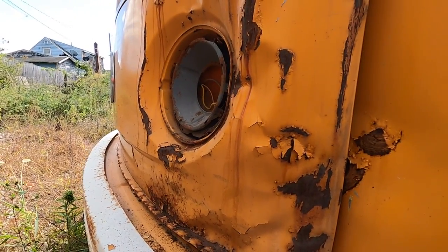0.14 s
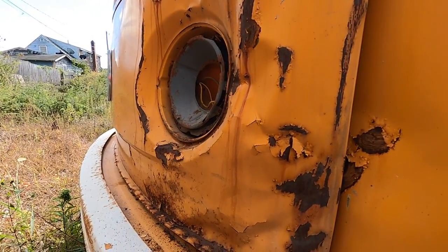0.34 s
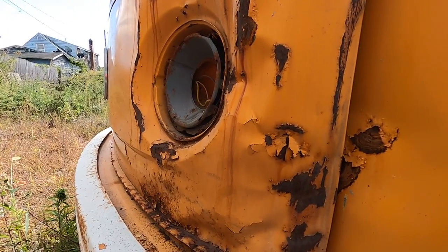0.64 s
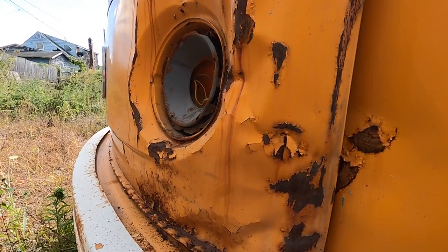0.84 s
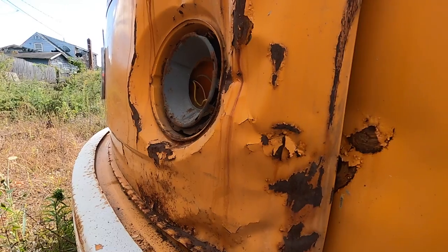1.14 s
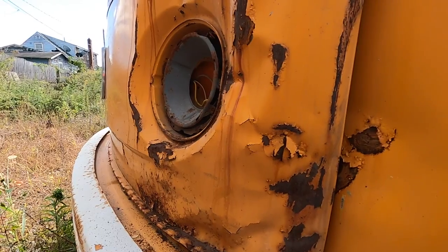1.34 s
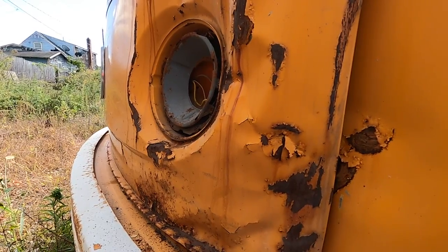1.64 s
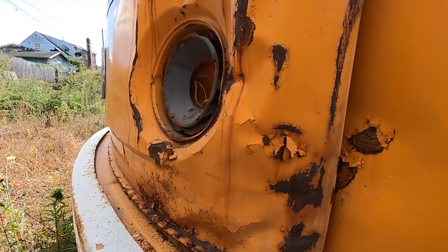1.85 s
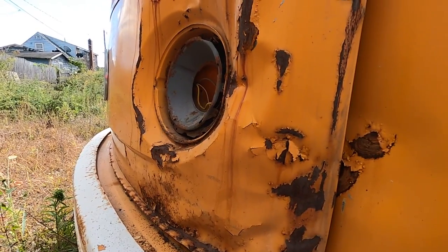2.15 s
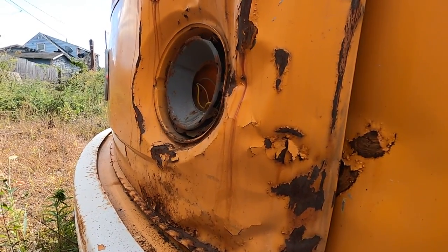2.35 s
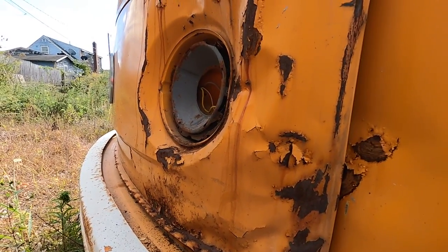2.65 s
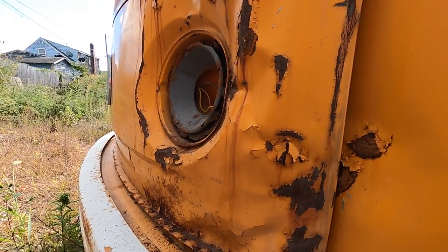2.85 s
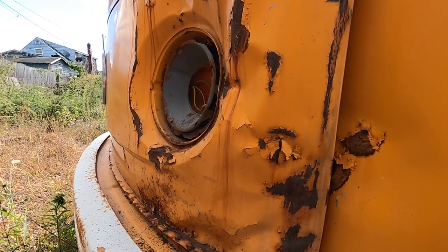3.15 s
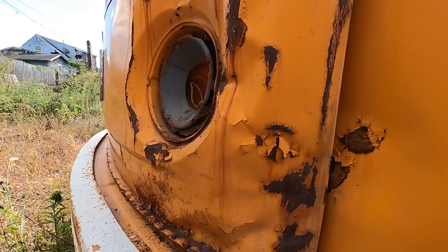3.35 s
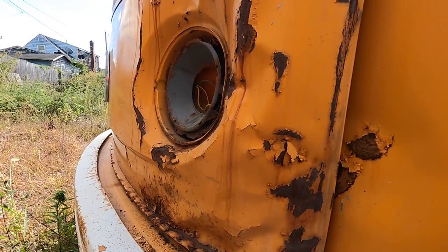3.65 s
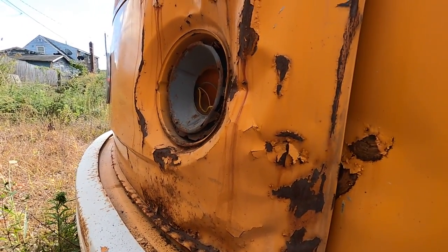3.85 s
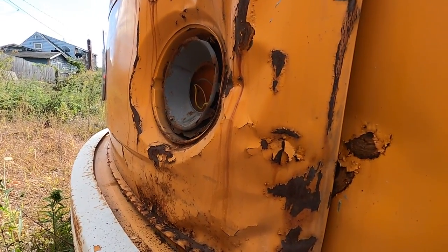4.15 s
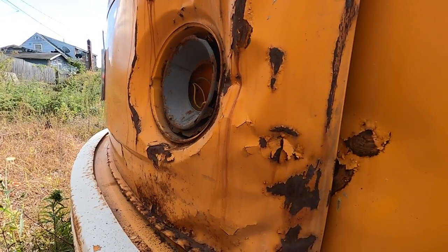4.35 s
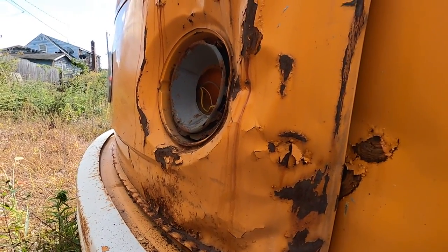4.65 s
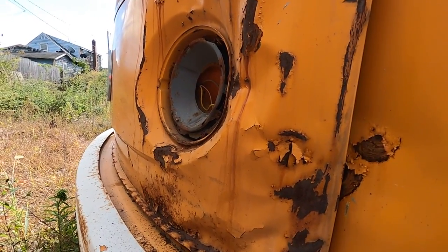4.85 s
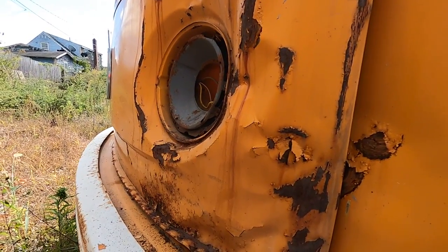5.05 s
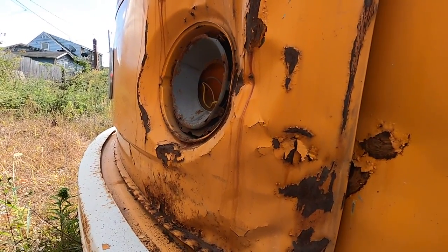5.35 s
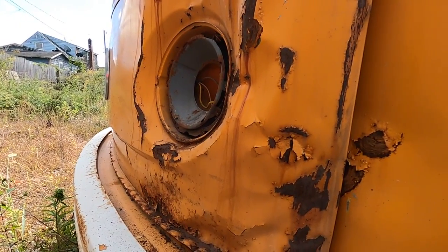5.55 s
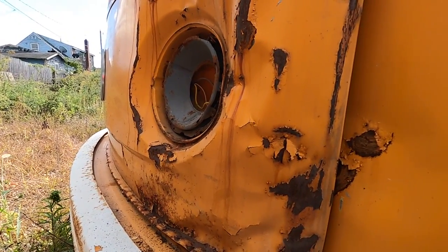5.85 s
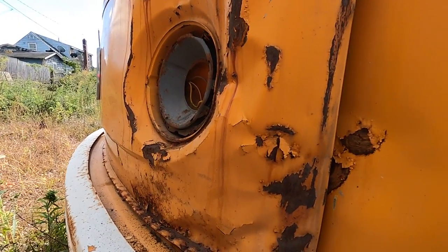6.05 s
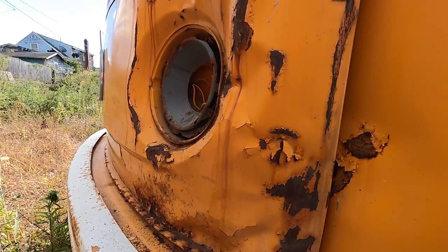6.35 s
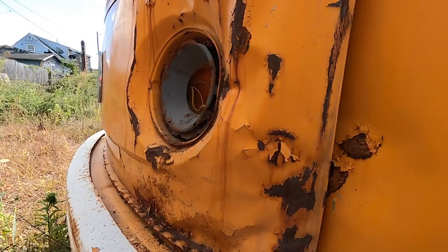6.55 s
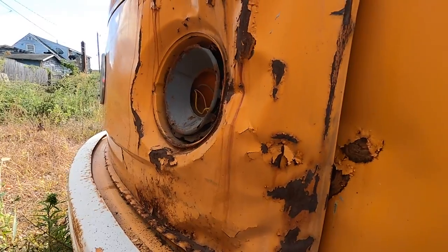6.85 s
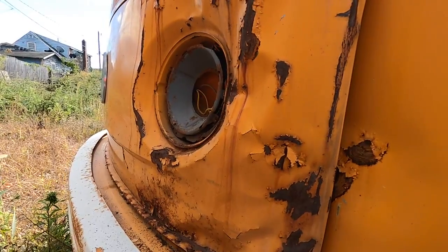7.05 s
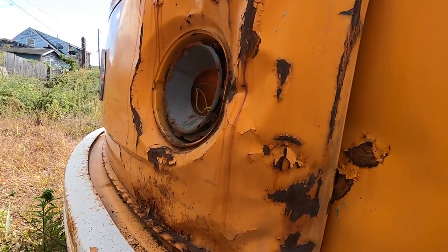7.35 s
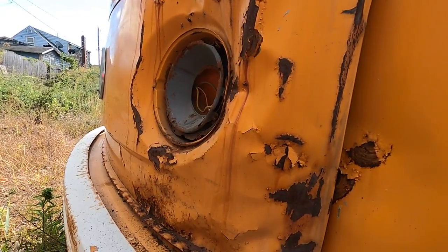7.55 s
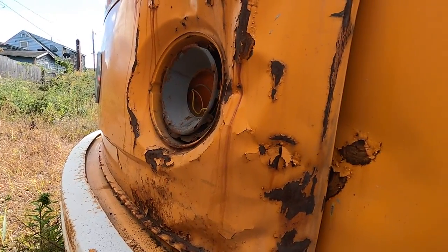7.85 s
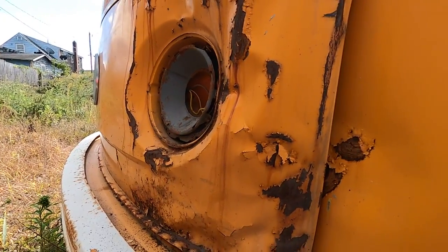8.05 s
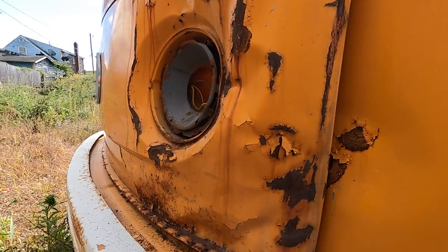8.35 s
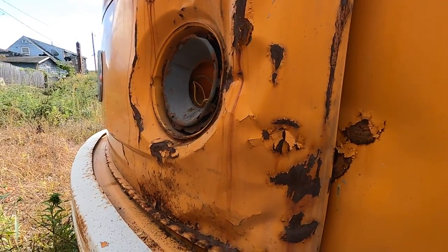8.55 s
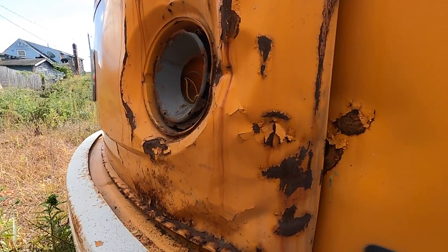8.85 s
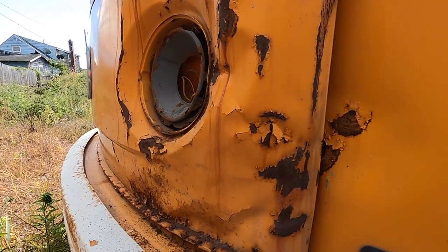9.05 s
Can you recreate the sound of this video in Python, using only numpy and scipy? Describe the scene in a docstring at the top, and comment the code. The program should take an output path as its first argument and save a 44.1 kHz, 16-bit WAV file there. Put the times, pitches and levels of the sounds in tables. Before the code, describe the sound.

Close up outdoors, a hydraulic hand pump pushes out a dented steel car panel. Loose handle pins rattle in sharp metallic clicks, lighter at one end of each stroke, then the stop lands with a short low thud that booms through the panel. Faint oil hiss, dull steel pops and tiny bright ticks fall between. High crickets trill steadily over distant traffic. Pumping ends before the last two seconds, leaving a late pop.

```python
"""In an overgrown yard a hand pump drives a hydraulic ram into a car's dented steel panel.
The handle's loose pins rattle as filtered noise bursts and set the tube and pump body ringing; its stop
thuds through the panel as short low tones, the steel pops, bright ticks snap and oil sings as narrow noise.
Crickets trill as pulsed resonances over the drone of far traffic, shaped noise with fuzzy engine tones.
All of it is heard by two close microphone ports."""
import sys
import numpy as np
from scipy import signal
from scipy.fft import rfft, irfft, next_fast_len
from scipy.io import wavfile
from scipy.ndimage import uniform_filter1d

SR = 44100
rng = np.random.default_rng(int(sys.argv[2]) if len(sys.argv) > 2 else 0)


def output_pcm(signal):
    """Save a mono or channel-first signal as 16-bit PCM at the path in sys.argv[1].

    Samples are clipped to [-1, 1] before scaling.
    """
    pcm = np.clip(np.atleast_2d(signal).T, -1, 1) * 32767
    wavfile.write(sys.argv[1], SR, np.round(pcm).astype(np.int16))


N = 406161  # length [samples]

# modes of the dented panel: (frequency [Hz], level [dB], decay by 60 dB [s])
PANEL_MODES = [(200.4, 9, 0.084), (285.3, -14, 0.43), (301.5, -7.5, 0.34), (353, 5, 0.064),
               (411, -10.5, 0.27), (476.6, 2.5, 0.069), (626, -16, 0.063), (722.5, -2.5, 0.087),
               (790, -23.5, 0.074)]
PORT_LAG = 2.0  # the left port hears the pump this much later [samples]
CLICK_PAN_DB = 1  # left minus right


def amp(db):
    """Decibels to a linear gain."""
    return 10 ** (np.asarray(db) / 20)


def evened(x):
    """Scales a sound to rms 1."""
    return x / np.sqrt(np.mean(x ** 2) + 1e-20)


def read(points, hz):
    """Reads a curve of (frequency, value) points along a log frequency axis."""
    point_hz, value = np.transpose(points)
    return np.interp(np.log(hz + 1), np.log(point_hz + 1), value)


def add(mix, start_s, sound):
    """Lays a sound into the mix, cut off at the end of the scene."""
    part = mix[..., round(start_s * SR):][..., :sound.shape[-1]]
    part += sound[..., :part.shape[-1]]


def band(x, lo_hz, hi_hz, order=2):
    """Band-pass filter."""
    return signal.sosfilt(signal.butter(order, [lo_hz, hi_hz], "band", fs=SR, output="sos"), x)


def resonate(x, hz, width_hz):
    """Shifts the curve hz down to zero, smooths, and shifts back: a resonance of gain 1."""
    turn = np.exp(2j * np.pi * np.cumsum(hz * np.ones(len(x))) / SR)
    r = np.exp(-np.pi * width_hz / SR)
    return 2 * (turn * signal.lfilter([1 - r], [1, -r], x / turn)).real


def resonate_twice(x, hz, width_hz):
    """Two equal resonances in a row give steeper skirts."""
    return resonate(resonate(x, hz, width_hz), hz, width_hz)


def struck(modes, t, damping=1):
    """An object's modes ring as decaying sines, struck in chance phases."""
    phases = rng.random(len(modes))
    ringing = 0
    for phase, (hz, db, t60) in zip(phases, modes):
        ringing = ringing + amp(db - 60 * damping * t / t60) * np.sin(2 * np.pi * (hz * t + phase))
    return ringing


def ports(x, pan_db, lag):
    """Places one sound at both ports: left lags by some samples and is louder by pan_db."""
    size = next_fast_len(len(x) + 16)
    late = irfft(rfft(x, size) * np.exp(-2j * np.pi * np.fft.rfftfreq(size) * lag), size)
    return np.array([late[:len(x)], x]) * amp([[pan_db / 2], [-pan_db / 2]])


def wash(colour, patchy_db, lag, size=1024):
    """Two-port noise of rms 1 from random short-time spectra, with drifting patches."""
    # left-right likeness: (frequency [Hz], likeness [0-1])
    likeness = [(60, 1), (270, 1), (500, 0.84), (1200, 0.67), (3300, 0.51), (6000, 0.077), (12000, 0.84)]
    # left minus right: (frequency [Hz], difference [dB])
    lean_points = [(60, -0.5), (250, 0), (500, 1.5), (1200, 2), (3300, 4), (6000, -1.5), (12000, 10)]
    frames, hz = 4 * N // size + 5, np.fft.rfftfreq(size, 1 / SR)
    a, b, c, d, patches = rng.standard_normal((frames, len(hz), 5)).T
    patches = uniform_filter1d(patches, size=10, axis=0)
    patches = evened(uniform_filter1d(patches, size=12, axis=1))
    same = np.clip(read(likeness, hz), 0, .988)[:, None]
    late = np.exp(-2j * np.pi * hz * lag / SR)[:, None]
    lean = amp(read(lean_points, hz)[:, None] / 2)
    right = a + 1j * b
    left = same * late * right + np.sqrt(1 - same ** 2) * (c + 1j * d)
    spectra = np.array([left * lean, right / lean])
    spectra *= amp(read(colour, hz)[:, None] + patchy_db * patches)
    return evened(signal.istft(spectra, nperseg=size, noverlap=3 * size // 4)[1][:, :N])


def traffic():
    """Rumble and tyre roar are coloured noise that swells and sinks as cars pass."""
    # (time [s], rumble level [dB], gain of the roar outside its hiss [dB], gain of the hiss [dB])
    levels = [(0.0, -40, -53.5, -50.5), (0.5, -42, -51.5, -50), (1.1, -41, -45.5, -46),
              (1.56, -39, -45.5, -46.5), (2.0, -37.5, -51, -49), (2.4, -39, -48.5, -48.5),
              (3.21, -39.5, -48.5, -48.5), (3.9, -41.5, -52, -49), (4.2, -36, -51.5, -48),
              (4.7, -38, -52, -47.5), (5.18, -36.5, -47.5, -45.5), (6.1, -39, -44.5, -44.5),
              (6.41, -38.5, -44.5, -45.5), (6.7, -38, -47.5, -46), (8.08, -40.5, -50, -46.5),
              (9.21, -38.5, -50.5, -46.5)]
    # rumble colour: (frequency [Hz], relative density [dB per Hz])
    rumble_colour = [(8.8, -50), (15, -4.5), (38, 0), (97, 0), (119, -1), (144, -4), (233, -11),
                     (299, -19.5), (373, -25.5), (500, -23.5), (650, -38.5), (1100, -120)]
    # tyre roar colour: (frequency [Hz], relative density [dB per Hz])
    roar_colour = [(210, -39), (350, -8), (432, -13.5), (637, -1), (797, -3.5), (875, 0.5), (1160, 2),
                   (1430, -5.5), (1590, -4), (1900, -9), (3380, -19), (3980, -18), (5100, -26.5),
                   (5800, -27.5), (7540, -61.5), (12800, -120)]
    t = np.arange(N) / SR
    times, *curves = np.transpose(levels)
    rumble_db, roar_db, hiss_db = (np.interp(t, times, curve) for curve in curves)
    roar = wash(roar_colour, patchy_db=1.6, lag=2.4)
    hiss = band(roar, 1400, 7900)
    rumble = wash(rumble_colour, patchy_db=1.5, lag=2.9, size=4096)
    return amp(rumble_db) * rumble + amp(roar_db) * (roar - hiss) + amp(hiss_db) * hiss


def drone(rows):
    """An engine order blurred by distance: a fuzzy line, a little different at each port."""
    times, hz, db = np.transpose(rows)
    t = np.arange(times[0], times[-1], 1 / SR)
    width_hz = .22 * hz[0]
    hz = np.interp(t, times, hz)
    mid, side = (evened(resonate_twice(v, hz, width_hz)) for v in rng.standard_normal((2, len(t))))
    mid = evened(np.sin(2 * np.pi * np.cumsum(hz) / SR) + 0.6 * mid)  # a steady core in the fuzz
    line = mid + [[.11], [-.11]] * side
    return amp(np.interp(t, times, db)) * line * signal.windows.tukey(len(t), .08)


def crickets():
    """Each wing stroke is a short burst in the wing's resonance; far ones blend into a band."""
    # single crickets: (song [Hz], resonance width [Hz], mean pulse rate [1/s], level [dB],
    # left minus right [dB], left lag [samples])
    singers = [(6330, 300, 54.5, -63, 1.0, 4.0), (6520, 300, 72.0, -63, 0.0, 3.5),
               (6180, 340, 46.0, -69, -1.0, 4.5), (6650, 300, 88.0, -70, 1.0, -3.0),
               (7570, 260, 64.0, -66.5, -2.0, 2.5)]
    # blend of far crickets: (frequency [Hz], relative density [dB per Hz])
    chorus_colour = [(3290, -57.5), (5600, -19.5), (6260, 6), (6530, 13.5), (6700, -18), (6810, -7.5),
                     (7050, 0.5), (7710, -1), (7840, -29.5), (8080, -16.5), (8650, -39.5), (11100, -53),
                     (13500, -25.5), (14500, -68.5), (15500, -70)]
    t = np.arange(N) / SR
    out = amp(-55) * wash(chorus_colour, patchy_db=1.0, lag=4.5, size=256)
    for hz, width_hz, rate, db, pan_db, lag in singers:
        phase, drift = rng.random(2)
        # the pulse rate wavers 0.92 times a second
        turns = rate * t + phase + 0.72 * np.sin(2 * np.pi * (0.92 * t + drift))
        strokes = np.maximum(np.sin(2 * np.pi * turns), 0) ** 2
        strokes *= 1 + 1.3 * np.sin(np.pi * turns)  # every other stroke is stronger
        song = resonate_twice(rng.standard_normal(N) * strokes, hz, width_hz)
        out += ports(amp(db) * evened(song), pan_db, lag)
    return out


def yard(x):
    """Ground, car body and walls throw back sparse taps that die quickly."""
    t = np.arange(6000) / SR
    taps = rng.choice([-1., 1.], (2, len(t))) * (rng.random((2, len(t))) < .05)
    taps *= amp(-60 * t / 0.11) * (t > .003)
    return signal.oaconvolve(x, taps / np.linalg.norm(taps[0]), axes=1)[:, :N]


def tick(db):
    """A dry snap of bright noise lasting a few milliseconds, perhaps paint flaking."""
    t = np.arange(2000) / SR
    snap = band(rng.standard_normal(len(t)) * np.exp(-t / 0.0028), 4500, 12500)
    return ports(amp(db) * snap / abs(snap).max(), -9.5, PORT_LAG)


def oil(start, end, hz, db, change_db):
    """Flow noise in a narrow valve resonance, its level sliding over the stroke."""
    t = np.arange(start, end, 1 / SR)
    waver = evened(uniform_filter1d(rng.standard_normal(len(t)), size=1200))
    stutter = evened(uniform_filter1d(rng.standard_normal(len(t)), size=600))
    flow = resonate_twice(rng.standard_normal(len(t)), hz * (1 + .012 * waver), 130.0)
    flow *= amp(2.5 * stutter)
    level = amp(db + change_db * (t - start) / (end - start))
    return ports(level * evened(flow) * signal.windows.tukey(len(t), .3), .8, PORT_LAG)


def pop(db, push_db):
    """A sudden step of the steel: one dull compact pulse, a brief ring and a single low heave."""
    t = np.arange(6000) / SR
    push_hz, push_s = 140, 0.0061  # the whole panel heaves once
    step = band(1. * (t == 0), 260, 1700, order=3)
    ringing = struck(PANEL_MODES, t, damping=2.5) * (1 - np.exp(-t / .002))
    push = -np.sin(2 * np.pi * push_hz * (t - .001)) * np.exp(-((t - push_s) / push_s) ** 2)
    steel = -step / abs(step).max() + amp(-4.5) * ringing
    return ports(amp(push_db) * push + amp(db) * steel, -1.8, PORT_LAG)


def thud(db, hz, ring_db, bounce_s):
    """A few cycles swell and fall, higher waves first; the handle bounces softly; the panel lingers."""
    t = np.arange(12000) / SR
    peak_s, rise_s, fall_s = 0.0061, 0.0024, 0.0075
    u = t - peak_s
    turn = 2 * np.pi * hz * (u - .002 * np.exp(-t / .0015))  # the pitch starts high
    blow = np.cos(turn - 1.2) - 0.14 * np.cos(2 * turn - 2.4)
    blow *= 1 - np.exp(-t / .0005)
    rising = u < -.0009
    blow *= np.exp(-abs((u + .0009) / np.where(rising, rise_s, fall_s)) ** np.where(rising, 2, 3))
    knock = amp(-2.0) * band(rng.standard_normal(len(t)), 400, 1300) * np.exp(-t / 0.013)
    # loose parts buzz on, in lumps
    shudder = amp(-4.5) * band(rng.standard_normal(len(t)), 220, 770) * np.exp(-t / 0.13)
    shudder *= amp(4.0 * evened(uniform_filter1d(rng.standard_normal(len(t)), size=400)))
    bounce = amp(-1.0) * np.cos(turn) * np.exp(-((t - bounce_s) / 0.011) ** 2)
    after = 1 - np.exp(-(t / .014) ** 3)  # the panel is heard once the blow lets go
    lingering = amp(ring_db) * (struck(PANEL_MODES, t, damping=0.73) + shudder + bounce) * after
    return ports(amp(db) * (blow + knock + lingering), -.8, PORT_LAG)


def handle_ring(db, tube_db, body_db):
    """A click sets the modes of the handle tube and the pump body ringing."""
    # handle tube: (frequency [Hz], level [dB], decay by 60 dB [s])
    tube_modes = [(2450, -12, .03), (3095, -11, .02), (3138, 0, .09)]
    # pump body: (frequency [Hz], level [dB], decay by 60 dB [s])
    body_modes = [(4465, -1, .045), (4642, 0, .052)]
    t = np.arange(4000) / SR
    ringing = amp(tube_db) * struck(tube_modes, t) + amp(body_db) * struck(body_modes, t)
    return ports(amp(db) * ringing * (1 - np.exp(-t / 0.0031)), CLICK_PAN_DB, PORT_LAG)


def click(db, low_db, low_hz, treble_db, contact_hz, rattle_s):
    """A snap and a few milliseconds of tiny impacts, coloured by the point of contact."""
    t = np.arange(4000) / SR
    shape = (1 - np.exp(-t / .0006)) * np.exp(-(t / rattle_s) ** 1.8)
    snap = 1 + .6 * np.exp(-t / .0008)
    hits = rng.standard_normal(len(t)) * amp(1.4 * rng.exponential(1, len(t))) * shape * snap
    mid = band(hits, 1700, 5300) + amp(5.0) * resonate_twice(hits, contact_hz, 750.0)
    # low bending waves travel slower along the handle and come 1.53 ms late
    low = band(np.roll(hits, round(0.00153 * SR)), 1110, 2300)
    low = low + amp(5.0) * resonate_twice(low, low_hz, 310.0)
    treble = band(hits, 5300, 11000) + amp(-10.0) * band(hits, 11000, 14400, order=3)
    rattle = mid / abs(mid).max() + amp(low_db) * low / abs(low).max()
    # the left port is shaded from the treble by 2.5 dB
    shaded = ports(amp(treble_db) * treble / abs(treble).max(), CLICK_PAN_DB - 2.5, 1.09)
    return amp(db) * (ports(rattle, CLICK_PAN_DB, PORT_LAG) + shaded)


def scene():
    """Lays the pump, panel and oil over the yard's echoes, engines, traffic and crickets."""
    # firing note of passing engines: (time [s], frequency [Hz], level [dB])
    engine_rows = [(1.0, 93.7, -58), (1.498, 97.9, -41.5), (1.799, 93.7, -40.5), (2.351, 90.83, -45),
                   (2.603, 92, -57), (3.602, 106, -74), (3.85, 103.9, -38.5), (4.3, 101.8, -51.5),
                   (4.8, 101.4, -42), (5.3, 103, -65), (5.8, 105, -51), (6.201, 92.6, -52),
                   (6.29, 87.55, -44), (6.36, 88.1, -47.5), (6.45, 87.4, -36.5), (6.52, 88.2, -28),
                   (6.62, 90.6, -53), (6.76, 87.5, -34.5), (6.83, 89, -33), (6.92, 89, -53),
                   (6.98, 89.8, -39), (7.15, 92.9, -44.5), (7.3, 94.9, -34.5), (7.42, 97.3, -42),
                   (7.55, 93.86, -34.5), (7.8, 95.1, -46), (7.92, 95.3, -51), (8.7, 98.6, -44.5),
                   (8.9, 101.3, -38.5), (8.97, 90.3, -44), (9.06, 87.6, -30), (9.21, 96, -32)]
    # fainter engine hums: (start [s], end [s], from [Hz], to [Hz], level [dB])
    hum_rows = [(3, 13, 48, 30, -46), (7.5, 9.21, 149, 152, -46.5), (6.65, 7.45, 270, 297, -51),
                (7.4, 9.21, 290, 302, -54)]
    # thin bright ticks: (time [s], peak [dB])
    tick_rows = [(0.2713, -60), (2.8474, -57), (3.7509, -57), (4.4752, -45), (5.3431, -51), (5.4073, -50),
                 (6.3004, -58), (6.559, -56), (7.366, -47.5), (7.8067, -57), (8.4417, -58), (8.7061, -59)]
    # oil through the valve on the push stroke:
    # (start [s], end [s], whistle [Hz], starting level [dB], change by the end [dB])
    oil_rows = [(0.05, 0.46, 3840, -77, 5), (1.043, 1.3, 3860, -80, -1), (1.834, 2.085, 3910, -71, 5),
                (2.442, 2.77, 3730, -75, 3), (2.785, 2.82, 3900, -58, -8), (3.4, 3.863, 3955, -75, 5),
                (4.259, 4.548, 3700, -70.5, 2), (7.647, 7.87, 3940, -80, 2)]
    # dents in the steel springing out: (time [s], pulse level [dB], low push level [dB])
    pop_rows = [(0.416, -36, -67), (1.966, -39.5, -46), (2.9143, -27.5, -58), (5.487, -33.5, -30),
                (8.629, -32.5, -37)]
    # the handle meets its stop and the panel booms:
    # (time [s], blow level [dB], pitch [Hz], panel ring re blow [dB], bounce delay [s])
    thud_rows = [(0.077, -31, 213, -13, 0.033), (0.536, -37.0, 327, -14, 0.045),
                 (0.7958, -19, 265.7, -14.5, 0.052), (1.013, -35.5, 289, -9.5, 0.051),
                 (1.349, -37, 338, -16, 0.048), (1.606, -16.5, 279, -14, 0.035),
                 (2.124, -37.5, 312, -13, 0.025), (2.4045, -19, 287, -9, 0.038),
                 (3.028, -32, 275, -11, 0.031), (3.3196, -17, 295, -12.0, 0.045),
                 (3.93, -33.5, 315, -13, 0.026), (4.175, -15.5, 299, -13.5, 0.048),
                 (4.75, -30, 244.0, -13, 0.049), (5.005, -20.5, 297, -11.0, 0.041),
                 (5.255, -33.5, 308, -12.5, 0.049), (5.87, -33, 319, -16, 0.041),
                 (6.1112, -17.5, 311.4, -12, 0.048), (6.275, -33, 310, -12, 0.027),
                 (7.048, -34.5, 318, -19, 0.031), (7.276, -26.5, 324, -9.5, 0.052)]
    # slack in the handle's pins taken up: (time [s], mid-band peak [dB], low rattle re mid [dB],
    # low colour [Hz], treble re mid [dB], tube ring re mid [dB], body ring re mid [dB],
    # contact colour [Hz], rattle time [s])
    click_rows = [(0.075, -59, 16, 1350, -40, -20, -18, 1350, 0.022),
                  (0.492, -42, -5.0, 1200.0, -14.0, -18.0, -18.0, 2140.0, 0.006),
                  (0.5055, -32.0, -4.5, 1420.0, -11, -8.5, -16, 3340, 0.0099),
                  (0.5376, -27.5, -3.5, 1440.0, -15.5, -28.0, -16, 3480, 0.0033),
                  (0.721, -44.0, -9.0, 990.0, -18.0, -18.0, -16, 3500.0, 0.0069),
                  (0.738, -47.0, -5.0, 1220.0, -15, -19.0, -14, 3800.0, 0.006),
                  (0.766, -36, -3, 1610.0, -13, -26, -12, 3000.0, 0.0054),
                  (0.784, -50.0, 8, 1540.0, -30.0, -18.0, -18.0, 1500.0, 0.006),
                  (0.791, -39, 10.5, 1520, -29, -18.0, -18.0, 3140.0, 0.0036),
                  (0.7938, -37.5, -5, 1390.0, -33.0, -15, -2, 3220, 0.0067),
                  (1.01, -35.5, 11.5, 950, -5, -17, -8, 3700, 0.0037),
                  (1.3211, -29.5, 1.5, 950, -10, -17, -12, 2250, 0.0052),
                  (1.346, -30, -16, 1150.0, -13.5, -33.0, -17, 2270, 0.0047),
                  (1.527, -45, 6, 1060.0, -26, -10.0, -16.0, 2040.0, 0.0051),
                  (1.576, -35, -4, 1120.0, -7.5, -15, -15.0, 4000.0, 0.0055),
                  (1.603, -36.5, 4, 1550.0, -29.0, -4, -15.0, 3140, 0.0071),
                  (1.76, -36, -1.0, 1020, -8.5, -16, -18, 4030, 0.011),
                  (2.083, -42, -5, 990.0, -14.0, -14, -18.0, 3600.0, 0.0052),
                  (2.0942, -32.5, 1, 1350, -9.5, -6, -13, 3700.0, 0.0055),
                  (2.1198, -33.5, -8, 1890.0, -16.0, -9, -30.0, 2190, 0.0064),
                  (2.374, -37.5, 2, 1120.0, -10, -25, -26.0, 2700, 0.0045),
                  (2.401, -36, 5, 980.0, -30.0, -7, -10, 2490, 0.0035),
                  (2.7868, -39.5, -13, 1250.0, -13, -26.0, -22.0, 3750, 0.0094),
                  (2.9963, -35, 2, 1500.0, -13, -9.0, -9, 3050, 0.005),
                  (3.026, -33.5, 0, 1390.0, -15, -14, -25, 2140, 0.0069),
                  (3.174, -47, 3, 960.0, -32, -21.0, -22.0, 2000.0, 0.0074),
                  (3.278, -50.0, -15.0, 970.0, -6.0, -18.0, -18.0, 4300.0, 0.004),
                  (3.2879, -41, -17, 960.0, -9, -20, -18.0, 3660, 0.0065),
                  (3.302, -38, -3, 1510.0, -17.0, -20, -20, 2590.0, 0.005),
                  (3.316, -33, -10, 1480.0, -21.0, -14, -18.0, 2600.0, 0.0033),
                  (3.3179, -31, -15, 1180, -30.0, -14, -17.0, 2650, 0.0023),
                  (3.552, -49, -10.0, 960.0, -18, -19.0, -20.0, 3000.0, 0.006),
                  (3.894, -42, -11.0, 1020.0, -13.0, -18.0, -18.0, 3550, 0.0069),
                  (3.9041, -29, -2.5, 1518, -16, -16.0, -17, 4150, 0.0069),
                  (3.9298, -27.5, -4, 1220.0, -8, -36, -18, 4370, 0.0056),
                  (4.1425, -35.5, -9, 1300.0, -13, -21, -15, 2600, 0.0047),
                  (4.156, -37, 1, 1160, -28, -18.0, -18.0, 2640.0, 0.006),
                  (4.1696, -20.0, -26, 1330, -30.0, -17.0, -13, 2804, 0.0027),
                  (4.7222, -28.5, -1.5, 1940, -6, -11, -8, 3870, 0.0048),
                  (4.7484, -25.5, -10, 1350, -8.5, -20.0, -17, 4280, 0.006),
                  (4.967, -33.5, -13.0, 1350.0, -13, -19.0, -12.0, 3830.0, 0.006),
                  (4.9966, -28, -5, 1400.0, -40.0, -5, -20.0, 2880, 0.0055),
                  (5.8414, -32, -1, 1560, -9.0, -18, -2, 4500, 0.0059),
                  (5.8668, -33, -2, 1770, -1.5, -15, -10, 3230, 0.0064),
                  (6.0913, -35, -23, 1070.0, -22.0, -20, -16, 2620.0, 0.006),
                  (6.1028, -34.0, -6, 1230.0, -35, -10, -23.0, 2450.0, 0.0073),
                  (6.9273, -42.5, -8.0, 1160.0, -42.0, -25.0, -17.0, 4320.0, 0.0057),
                  (6.993, -40, -17.0, 960.0, -24, -22, -12, 3560, 0.006),
                  (7.0149, -33.5, -2.5, 1420.0, -20, -20, -18, 3400, 0.0037),
                  (7.022, -40, 2, 1540, -7, -6, 1, 4500, 0.0088),
                  (7.046, -28.5, -1, 1360.0, -16, -20, -28, 2060, 0.005),
                  (7.237, -29.5, -7.5, 1490, -11, -23, -23, 5200, 0.0037),
                  (7.253, -33.5, 0, 1134, -24.0, -23, -20, 2566, 0.0048),
                  (7.2681, -36.0, 4, 1610.0, -27.0, -8, -16, 3160, 0.0036)]
    bright, deep, steady = np.zeros((3, 2, N))
    for mix, rows, sound in ((bright, tick_rows, tick), (deep, thud_rows, thud), (deep, pop_rows, pop)):
        for start, *settings in rows:
            add(mix, start, sound(*settings))
    for start, db, low_db, low_hz, treble_db, tube_db, body_db, contact_hz, rattle_s in click_rows:
        add(bright, start, click(db, low_db, low_hz, treble_db, contact_hz, rattle_s))
        add(steady, start, handle_ring(db, tube_db, body_db))
    for row in oil_rows:
        add(steady, row[0], oil(*row))
    for start, end, from_hz, to_hz, db in hum_rows:
        add(steady, start, drone([(start, from_hz, db), (end, to_hz, db)]))
    add(steady, engine_rows[0][0], drone(engine_rows))
    echoes = yard(amp(-7.0) * bright + amp(-24.0) * deep)
    return bright + deep + echoes + steady + traffic() + crickets()


def record(dry):
    """A steep low-pass ends the treble near 15.7 kHz."""
    lowpass = signal.firwin(511, 15700, window=("kaiser", 9), fs=SR)
    return signal.oaconvolve(dry, lowpass[None], "same")


dry = scene()
out = record(dry)
output_pcm(out)
```